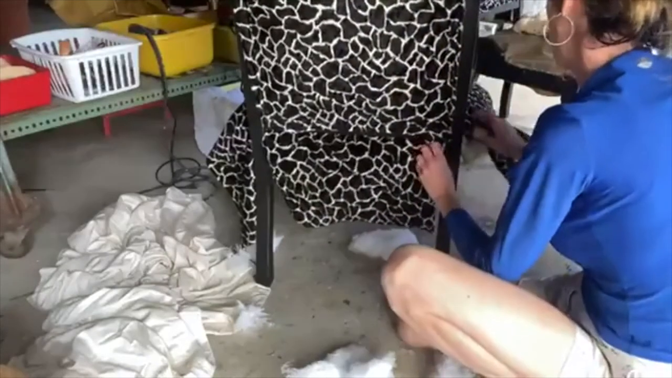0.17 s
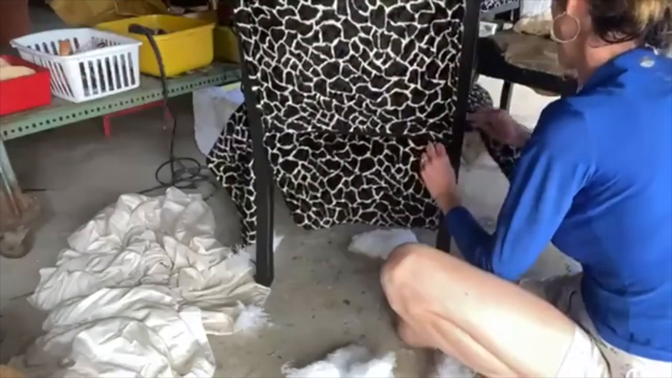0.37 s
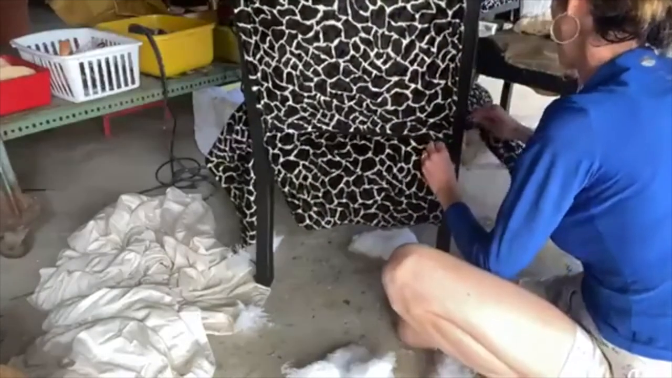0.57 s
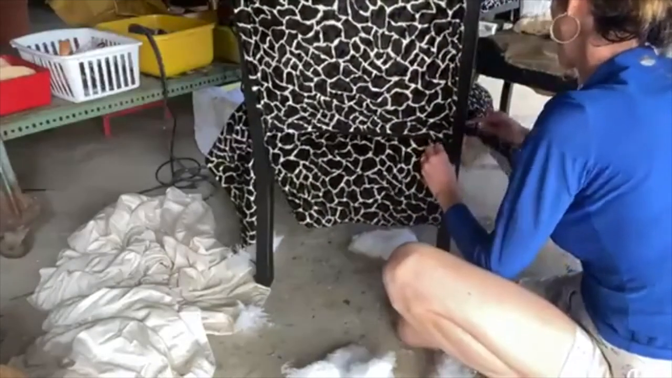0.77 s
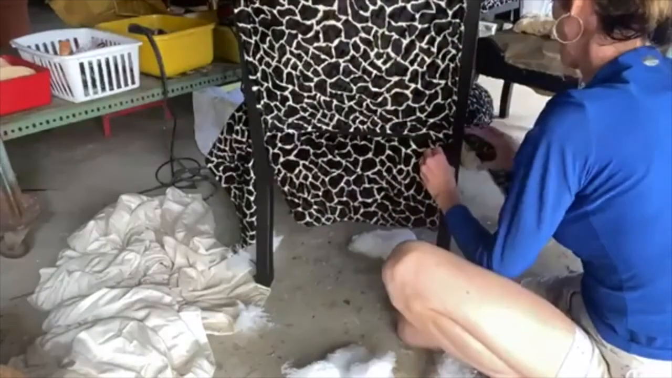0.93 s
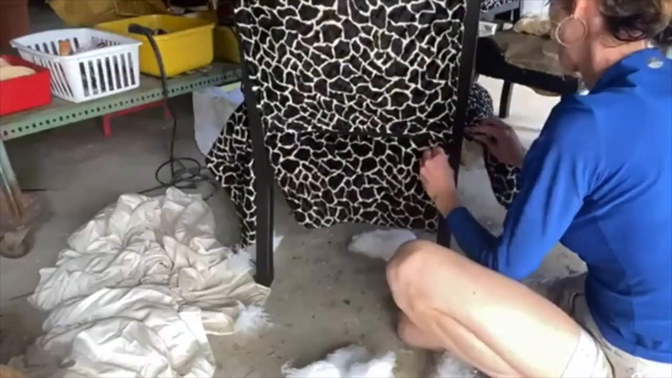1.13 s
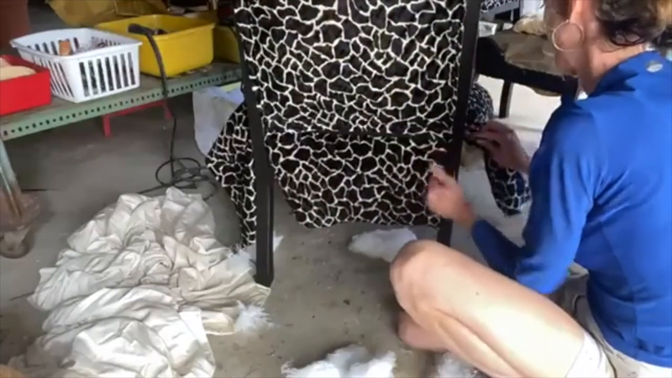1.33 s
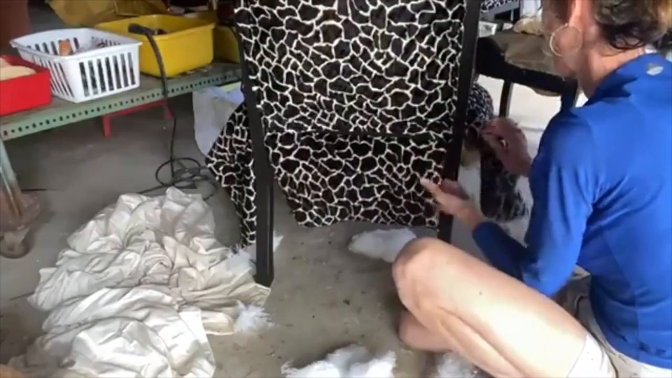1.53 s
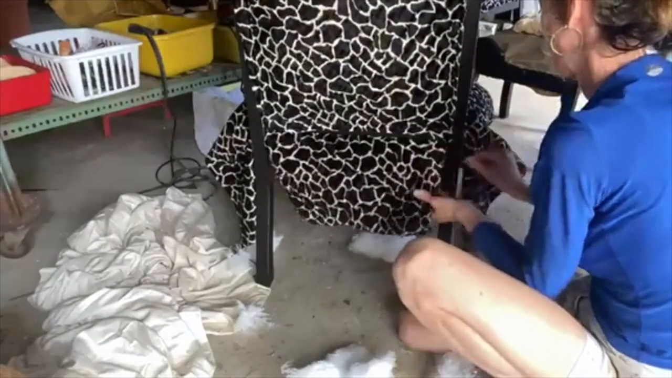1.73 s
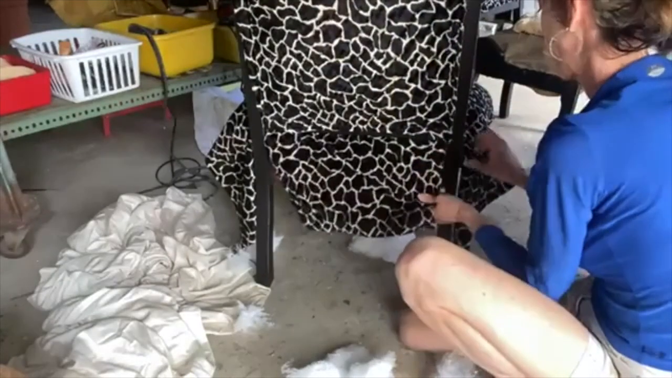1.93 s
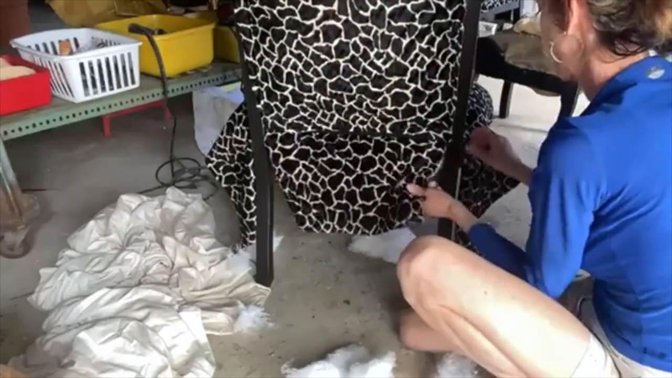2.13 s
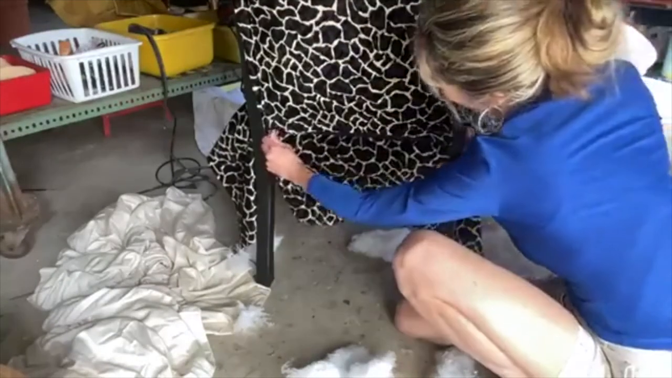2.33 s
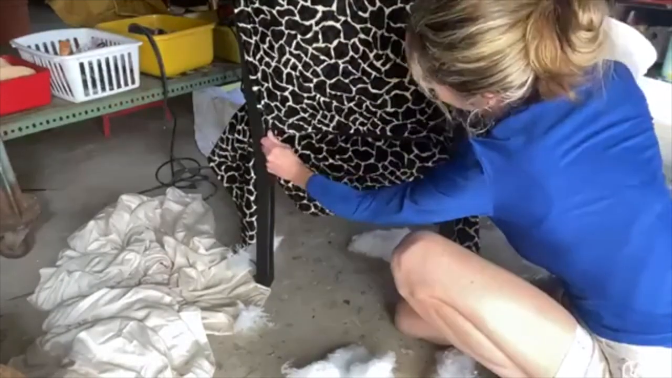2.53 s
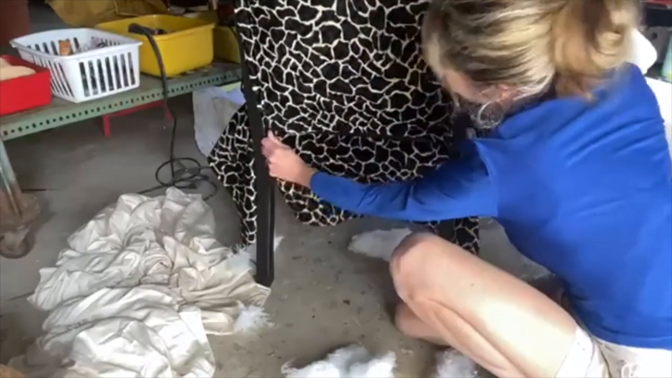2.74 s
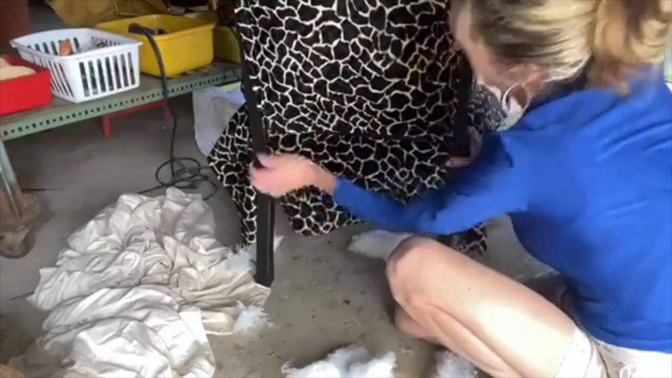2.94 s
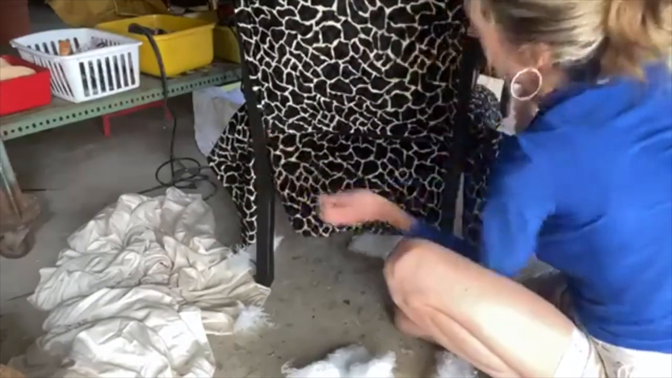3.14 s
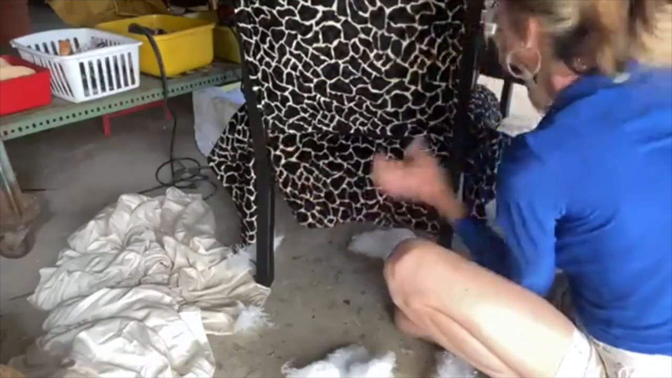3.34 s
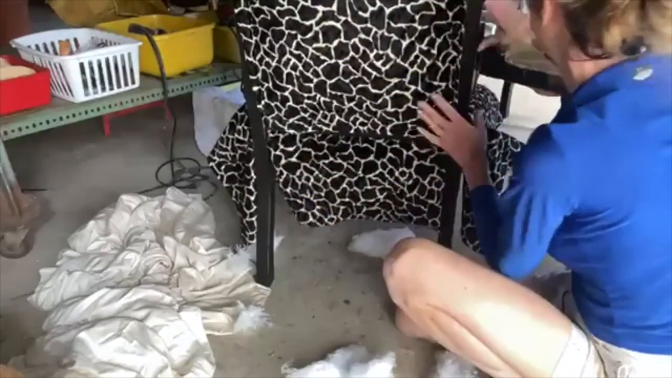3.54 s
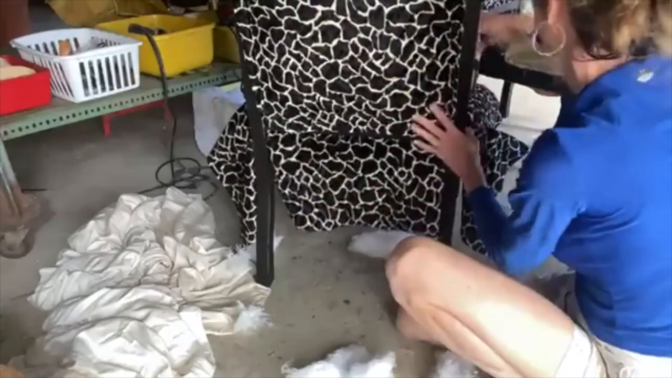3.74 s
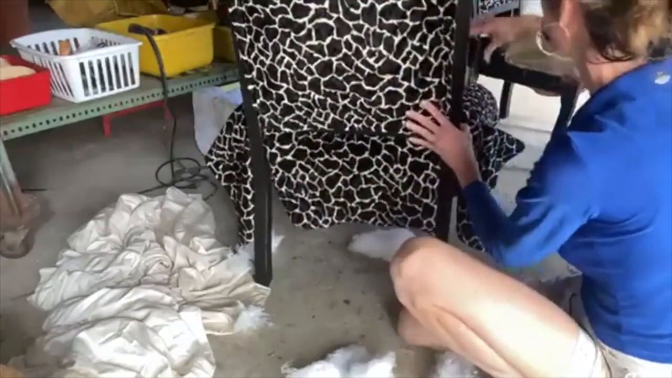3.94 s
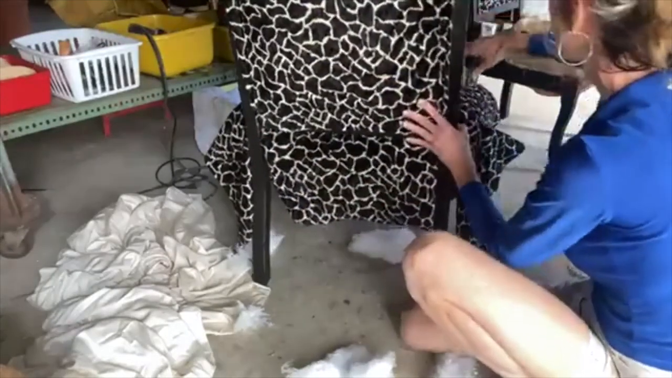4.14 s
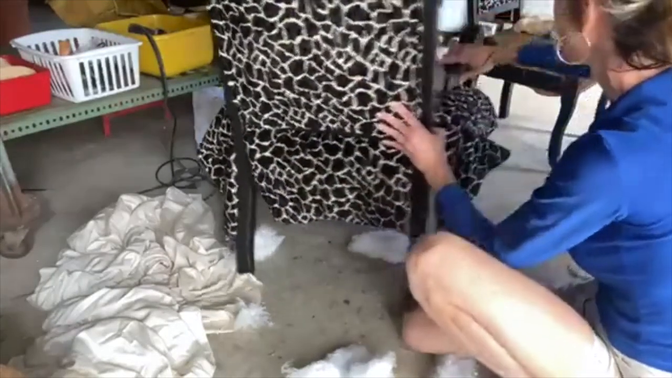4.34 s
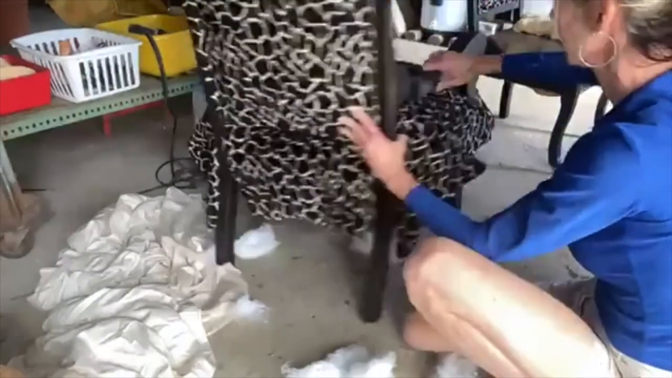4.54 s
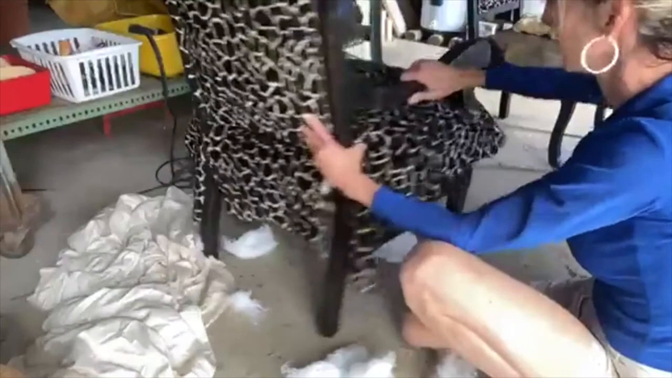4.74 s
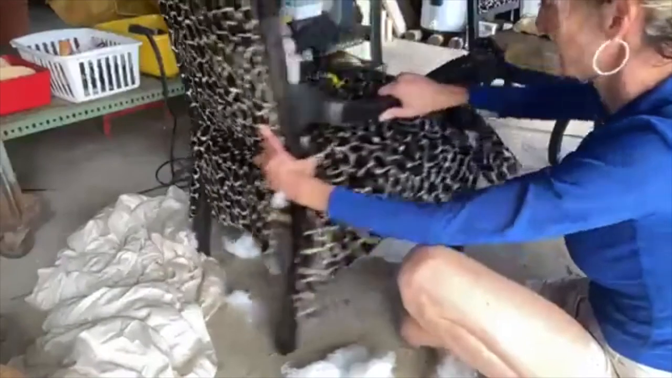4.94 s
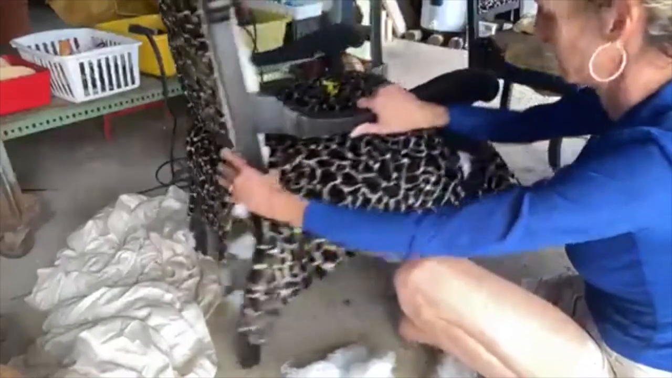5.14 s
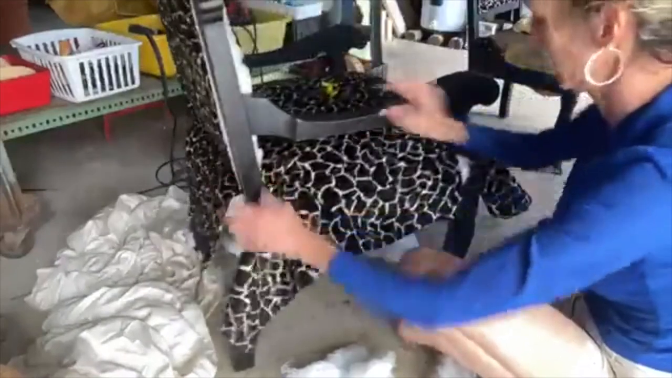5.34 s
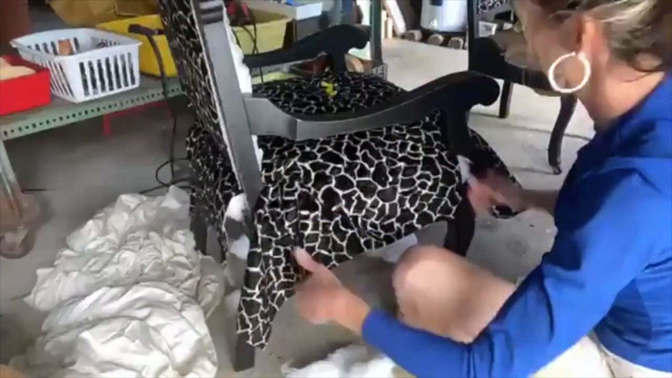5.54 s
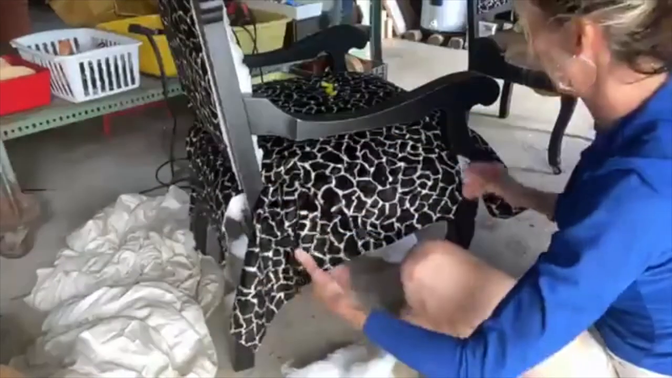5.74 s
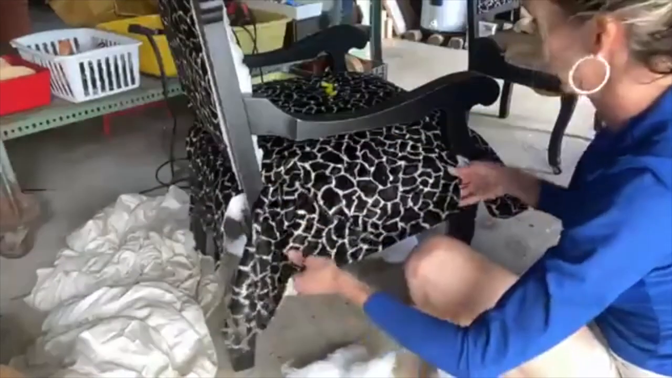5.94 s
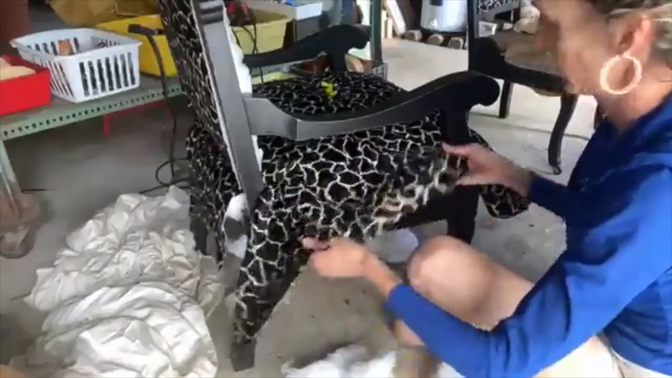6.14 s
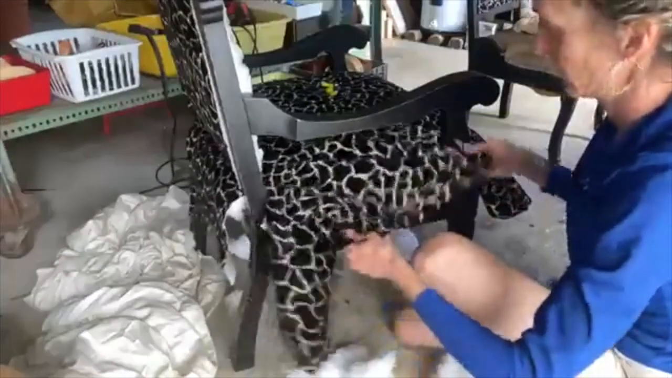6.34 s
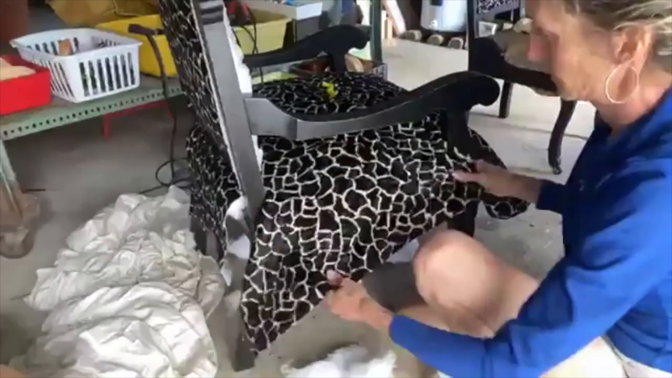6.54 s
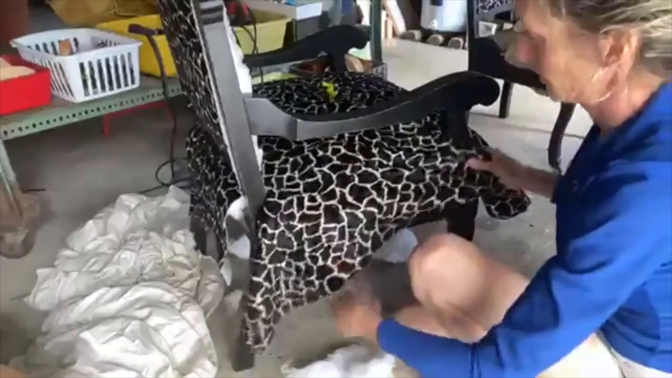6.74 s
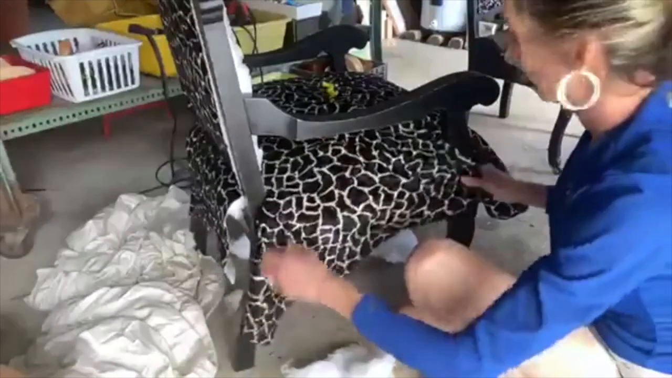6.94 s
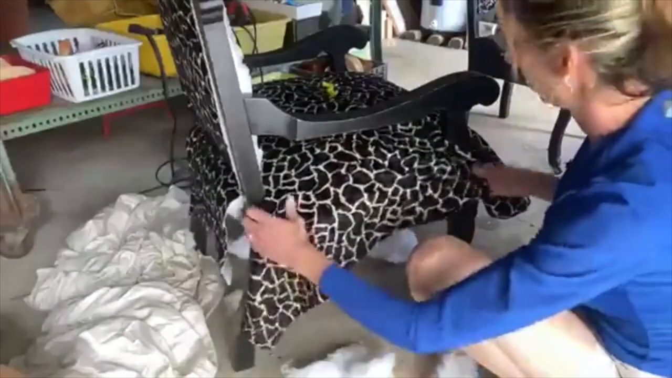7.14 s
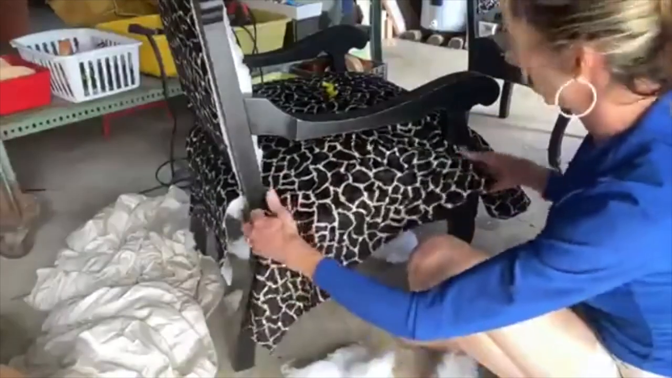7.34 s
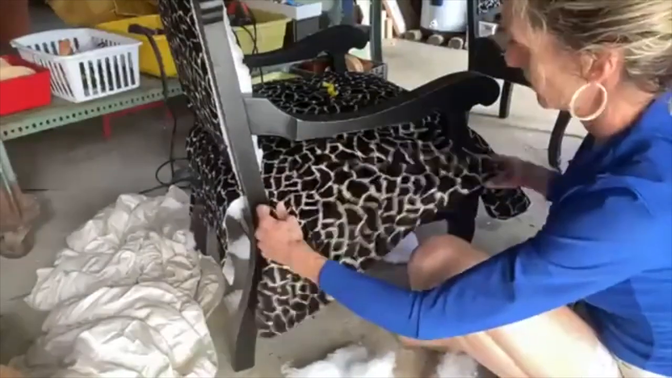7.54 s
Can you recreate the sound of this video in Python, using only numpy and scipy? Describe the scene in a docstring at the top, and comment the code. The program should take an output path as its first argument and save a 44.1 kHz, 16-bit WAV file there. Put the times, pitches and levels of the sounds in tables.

```python
"""A garage, humming and hissing faintly, where hard walls answer every knock on a wooden chair.
Fabric rustles as filtered noise; hand knocks, joint creaks and leg landings jolt the frame's resonances.
Then the chair is turned: its legs stick and slip over concrete as uneven clicks that ring the frame,
with a short squeal and groan made of swelling sines, while grit crunches under them as brighter clicks."""
import sys
import numpy as np
from scipy import signal
from scipy.fft import rfft, irfft, next_fast_len
from scipy.io import wavfile
from scipy.ndimage import map_coordinates

SR = 44100
rng = np.random.default_rng(int(sys.argv[2]) if len(sys.argv) > 2 else 0)


def unload_wav(signal):
    """Save mono or channel-first audio to the path in sys.argv[1] as 16-bit WAV at rate SR, clipped to [-1, 1]."""
    wavfile.write(
        sys.argv[1],
        SR,
        np.round(np.clip(np.atleast_2d(signal).T, -1, 1) * 32767).astype(np.int16),
    )


N = 335009
T = np.arange(N) / SR  # time in seconds

# Garage hum and hiss. Each row: frequency in Hz, relative level in dB per Hz.
AIR_COLOUR = [(12, -46), (20, -53), (56, 5.5), (95, 0), (186, -2), (291, -4.5), (601, -15.5), (672, -12),
              (993, -20), (1140, -12), (1350, -18.5), (7820, -31), (8500, -33.5), (14400, -36),
              (15700, -39)]
# A distant motor's low drone: frequency in Hz, width in Hz, level in dB.
DRONE = (83.4, 15, -61.5)
# How long the walls' answer lasts. Each row: frequency in Hz, t60 in seconds.
WALL_DECAY = [(150, 0.29), (1000, 0.15), (4000, 0.2), (12000, 0.11)]
# Brief dips in level. Each row: centre in seconds, half width in seconds.
LEVEL_DIPS = [(.127, 0.011), (5.864, 0.0092), (5.931, 0.014)]

# Fabric and hands moving. Each row: time in seconds, swish level in dB.
CLOTH_MOVES = [(0, -63), (0.1, -69.5), (3.65, -70), (3.84, -54), (4.0, -62), (4.1, -61), (5.35, -71),
               (5.6, -72.5), (5.94, -66.5), (6.24, -63), (6.6, -69.5), (7.34, -67.5), (7.6, -63.5)]
# Single strokes of cloth over cloth. Each row: start in seconds, length in seconds, swish in dB, sizzle in dB.
CLOTH_STROKES = [(0.523, 0.043, -78, -55), (1.677, 0.2, -79, -66), (3.114, 0.13, -59.5, -66),
                 (3.234, 0.084, -68, -64), (5.502, 0.035, -74, -61), (6.05, 0.099, -74, -89),
                 (6.274, 0.24, -72, -66), (6.552, 0.14, -65, -60.5), (6.808, 0.077, -58.5, -61),
                 (6.963, 0.12, -75, -64)]
# Colour of the soft swish. Each row: frequency in Hz, relative level in dB per Hz.
SWISH_COLOUR = [(880, -35), (1500, 1), (1590, -9), (1970, -2), (3810, -3.5), (6170, -6), (7890, -5.5),
                (15700, -33)]
# Colour of the low brush. Each row: frequency in Hz, relative level in dB per Hz.
BRUSH_COLOUR = [(88, -54), (150, -19), (255, -7), (363, 3.5), (548, 0), (837, -0.5), (2500, -18.5),
                (3250, -33), (5500, -120)]
# Colour of the finest rubbing noise. Each row: frequency in Hz, relative level in dB per Hz.
SIZZLE_COLOUR = [(6000, -40), (10000, -1), (12500, 4.5), (15000, 6)]

# The chair frame's resonances. Each row: frequency in Hz, width in Hz, relative level in dB.
FRAME_MODES = [(154, 63.7, 0), (184, 23, -0.5), (230.6, 22, -1), (339.4, 23, 2), (397, 45, 2),
               (539, 46, 8.5), (686, 106, 3), (786, 75, 3.5), (979, 172, 2), (1094, 58, 6.5),
               (1216, 170, 0.5), (1482, 200, 1.5), (1630, 94, 4), (1980, 170, -1), (2230, 230, -3),
               (2390, 590, -2.5), (2824, 77, -8), (3133, 58, -1.5), (3243, 116, -4), (3773, 78, 2.5),
               (4480, 51, 9), (5400, 270, -23)]
# Hand knocks and taps, coloured by where they land. Each row: start in seconds, body peak in dB,
# thud, ring and snap in dB over the body, echo in dB over the blow, then thud, body and ring centres in Hz.
HAND_KNOCKS = [(0.04, -36, -15, -2.5, -31, -1.5, 129, 1350, 3320),
               (0.256, -34.5, 5.5, -16, -26, -4.5, 141, 720, 2200),
               (0.34, -40, -26, -19, -15, -11, 242, 1460, 3030),
               (0.497, -42, 8, -20, -21, -8.5, 138, 500, 2690),
               (0.539, -33.5, -6, -19, -5, -8.5, 151, 1020, 2580),
               (0.63, -55, 11.5, -14, -12, -3.5, 138, 600, 2240),
               (0.981, -43, -14, -29, -27, -22, 152, 900, 2270),
               (1.139, -45, -15, -11, -16, -10, 132, 735, 2380),
               (3.233, -56, 4, -12, 16, -7, 121, 1050, 2950),
               (3.325, -60.5, -6, 17, -2, -8, 339, 649, 3550),
               (3.659, -36, 0.5, -12, -4.5, 2, 246, 770, 2430),
               (3.679, -24, -41, -10.5, -30, -4.5, 240, 1680, 2930),
               (3.776, -39, 1.5, -3, -11, -4, 236, 686, 3700),
               (3.815, -43, -2, -14, -24, -6, 236, 1490, 3040),
               (3.822, -20, -9.5, 1.5, -3.5, -3, 233, 1460, 3070),
               (3.839, -29, 3, -7, -3, -10, 153, 1410, 3100), (3.859, -40, -5, 3, 5.5, 4, 136, 1500, 3100),
               (3.982, -31.5, -5.5, -5.5, -0.5, -2.5, 182, 840, 2510),
               (4.154, -38.5, -1, 7.5, 6, -5, 271, 1010, 3750),
               (6.216, -37, -6.5, -17, -2, -6, 265, 870, 3400),
               (6.509, -61.5, 17.5, -6, -5, -15, 127, 1150, 2580),
               (6.842, -31.5, -15, -10.5, -33, -9, 156, 814, 2430),
               (7.084, -46, -3.5, -6, 0, -12, 196, 770, 3660),
               (7.589, -29, -30, -3, 3.5, -5, 450, 1580, 3280)]
# A joint creaks under the hand, slip by slip. Each row: start in seconds, body peak in dB,
# thud in dB over the body, thud centre in Hz, body centre in Hz.
JOINT_CREAKS = [(2.42, -27, -11.5, 360, 1100), (2.439, -34, -10, 365, 1060), (2.461, -30.5, -7, 150, 1060),
                (2.476, -35.5, -2.5, 350, 1020), (2.491, -36.5, -8.5, 150, 1040),
                (2.512, -43, 3, 150, 1190), (2.573, -27.5, -11.5, 130, 1140), (2.589, -35, -9, 340, 1090),
                (2.605, -42, -6, 150, 1340), (2.8, -34.5, -21, 120, 1120), (2.817, -34, -27, 170, 1300),
                (2.832, -39, -18, 200, 1140), (2.846, -42, -18, 200, 1140), (2.899, -31.5, -20, 280, 1520),
                (2.914, -38, -13, 280, 1300), (2.929, -37.5, -13.5, 190, 1075),
                (2.945, -42, -12, 190, 1100)]
# A dragged leg hops and lands. Each row: start in seconds, body peak in dB,
# ring in dB over the body, body centre in Hz, ring centre in Hz.
LEG_HOPS = [(4.555, -21.5, -15, 1000, 2430), (4.666, -19, -22, 764, 2290), (4.752, -16, -6, 1120, 3180),
            (4.836, -17, -5.5, 1300, 4300), (4.846, -19, 1, 1270, 3500), (4.946, -15.5, 0, 610, 2510),
            (4.972, -20, -7, 1080, 2440), (5.01, -12, -5, 740, 2580), (5.041, -21, -8, 735, 2200),
            (5.071, -25.5, -1, 773, 2800), (5.095, -16.5, -6, 640, 2360), (5.123, -16, -26, 597, 2600),
            (5.156, -14.5, -12, 975, 2420), (5.277, -29, 1.5, 1440, 3040)]
# Shared by all hand knocks: body and ring spreads in octaves, crack as a share of broad noise
# on the ring, damping t60 in seconds (how fast the grip stills the ring).
HAND_CONTACT = (0.81, 0.15, 0.34, 0.55)
# Shared by all creaks: ring and snap in dB over the body, echo in dB over the blow, ring centre in Hz,
# body and ring spreads in octaves, crack share, damping t60 in seconds (negative: it feeds the ring).
JOINT_CONTACT = (-11, -27, -3, 2900, 0.76, 0.26, 0.1, -1)
# Shared by all hops: thud and snap in dB over the body, echo in dB over the blow, thud centre in Hz,
# body and ring spreads in octaves, crack share, damping t60 in seconds (how fast the floor stills the ring).
LEG_CONTACT = (-9.5, -15.5, -5, 218, 0.9, 1, 4.2, 0.2)

# A slipping leg locks onto one resonance and sings. Each row: start in seconds, length in seconds,
# pitch in Hz, level in dB before the flutter.
LEG_SINGS = [(2.933, 0.056, 1115, -52), (3.704, 0.065, 822, -47.5), (4.114, 0.042, 298.7, -35),
             (4.191, 0.021, 362, -31), (4.247, 0.048, 1627, -21.5), (4.301, 0.036, 1620, -21.5),
             (4.283, 0.066, 345, -28.5), (4.325, 0.023, 354.5, -22), (4.35, 0.037, 339.5, -19),
             (4.399, 0.015, 343.7, -19), (4.492, 0.047, 960, -28), (4.552, 0.024, 346.6, -26.5),
             (4.553, 0.033, 1014, -27), (4.627, 0.04, 743, -25), (4.809, 0.026, 660, -25.5),
             (4.937, 0.014, 2610, -26.5), (5.032, 0.024, 708, -21), (5.034, 0.032, 189, -27),
             (5.129, 0.021, 185.6, -25), (5.156, 0.043, 226.4, -21.5), (5.201, 0.027, 185, -30),
             (5.203, 0.043, 790, -31)]
# The legs dragging. Each row: time in seconds, rasp level in dB, rumble and grit in dB over the rasp,
# all before the blend gains and unsteadiness in drag().
LEG_DRAG = [(4.07, -65, -6, -9), (4.125, -48.5, 9.5, -6.5), (4.17, -44.5, -3, -8), (4.21, -33, 4.5, -7.5),
            (4.28, -30.5, -6.5, -5), (4.4, -30, -4, -8), (4.46, -32, 1, -4), (4.62, -24.5, -6.5, -10),
            (4.75, -29, -6.5, -10.5), (4.9, -31, 0, -11.5), (4.96, -24.5, -12, -11), (5.0, -34, -7, -9),
            (5.02, -24.5, 0, -9), (5.09, -30, 1, -4), (5.19, -28, 2, -14), (5.24, -32, 4.5, -17.5),
            (5.29, -51, 8, 1), (5.37, -72, 6, 2)]
# Colour of the coarse grit. Each row: frequency in Hz, relative level in dB per Hz.
GRIT_COLOUR = [(820, -18), (1400, -21), (1680, -5), (2840, -7.5), (4010, -11.5), (4300, -11.5),
               (9860, -21.5), (15200, -81), (15700, -64)]

AIR_DB = -56  # centre level; it breathes around this
BRUSH_DB, BRUSH_SWINGS = 1.5, 1.49  # low brush over the median swish; how much wider it swings in dB
DUST_DB, DUST_GROWS_DB = -29.5, 22  # finest grit over the grit curve at the start, and its gain by the end
KEEN_START, KEEN_END = 0.89, 0.2  # share of the brighter rasp as the load moves to other legs
TURNING_ECHO_DB = -11.0  # how much of the turning chair reaches the walls
TOP_HZ = 15800  # upper band limit


def amp(db):
    """dB to gain."""
    return 10 ** (np.asarray(db) / 20)


def unit(x):
    """Scale to rms 1."""
    return x / np.sqrt(np.mean(x ** 2) + 1e-20)


def along(points, hz):
    """Read (Hz, value) points on a log frequency axis."""
    f, v = np.transpose(points)
    return np.interp(np.log(hz + 1), np.log(f + 1), v)


def curves(rows):
    """One value per sample for each column after the time."""
    times, *columns = np.transpose(rows)
    return [np.interp(T, times, column) for column in columns]


def during(rows, fade):
    """1 while the table runs, fading over some seconds beyond both ends."""
    first, last = rows[0][0], rows[-1][0]
    return np.interp(T, [first - fade, first, last, last + fade], [0, 1, 1, 0])


def wobble(rate):
    """A smooth random curve with rate knots a second."""
    knots = rng.standard_normal(int(N * rate / SR) + 4)
    return map_coordinates(knots, [T * rate])


def filtered(x, response):
    """Shape x by a complex response of frequency."""
    m = next_fast_len(N + SR // 2)
    return irfft(rfft(x, m) * response(np.fft.rfftfreq(m, 1 / SR)), m)[:N]


def coloured(x, spectrum):
    """Give x the colour of (Hz, dB) points, at rms 1."""
    return unit(filtered(x, lambda f: amp(along(spectrum, f))))


def peak(f, hz, width):
    """One causal resonance."""
    return 1j * f * width / (hz * hz - f * f + 1j * f * width)


def frame(lo_hz, hi_hz, centre_hz=1, octaves=np.inf):
    """The frame's resonances between two frequencies, favouring those near a centre."""
    modes = [(hz, width, db - 6 * (np.log2(hz / centre_hz) / octaves) ** 2)
             for hz, width, db in FRAME_MODES if lo_hz < hz < hi_hz]
    # neighbouring resonances have opposite signs
    return lambda f: sum((-1) ** k * amp(db) * peak(f, hz, width)
                         for k, (hz, width, db) in enumerate(modes))


def grains(rate, spread_db, smooth):
    """Random clicks of skewed but bounded sizes, rate a second, on a bed of plain noise."""
    size_db = spread_db * np.minimum(rng.exponential(size=N), 2.5)
    hits = rng.random(N) < rate / SR
    clicks = hits * amp(size_db) * rng.choice([-1, 1], N)
    return unit(clicks) + smooth * rng.standard_normal(N)


def catches(rate, scatter, spread_db):
    """One-way jerks as a foot catches and lets go, at uneven intervals."""
    count = np.cumsum(rate * np.exp(scatter * wobble(60))) / SR
    jerks = -np.diff(np.floor(count), prepend=0)
    return jerks * amp(spread_db * np.clip(rng.standard_normal(N), -2, 2))


def air():
    """Steady coloured noise, breathing a little, over a narrow resonant drone."""
    hz, width, db = DRONE
    drone = unit(filtered(rng.standard_normal(N), lambda f: peak(f, hz, width) ** 2))
    hiss = amp(AIR_DB + 1.1 * wobble(3.53)) * coloured(rng.standard_normal(N), AIR_COLOUR)
    return hiss + amp(db + 2.3 * wobble(0.99)) * drone


def walls(x):
    """Noise tails whose frequencies each die at their own speed; every stretch gets its own echoes."""
    out, step = np.zeros(N + SR), SR // 8
    delay = 250  # samples before the first answer
    for start in range(0, N, step):
        hz, t, z = signal.stft(rng.standard_normal(SR // 3), SR, nperseg=256)
        decay = amp(-60 * t / along(WALL_DECAY, hz)[:, None])
        tail = signal.istft(z * decay, SR, nperseg=256)[1]
        wet = signal.fftconvolve(x[start:start + step], tail / np.linalg.norm(tail))
        out[start + delay:][:len(wet)] += wet[:len(out) - start - delay]
    return out[:N]


def cloth():
    """Sliding fabric rubs out soft swishes and low brushes, with a few distinct sizzling strokes."""
    swish = coloured(rng.standard_normal(N), SWISH_COLOUR)
    brush = coloured(rng.standard_normal(N), BRUSH_COLOUR)
    sizzle = coloured(grains(2500, spread_db=4, smooth=1.2), SIZZLE_COLOUR)
    strokes = np.zeros(N)
    for s, length, stroke_db, sizzle_db in CLOTH_STROKES:
        swell = np.sin(np.pi * np.clip((T - s) / length, 0, 1))
        strokes += swell * (amp(stroke_db) * swish + amp(sizzle_db) * sizzle)
    swish_db, = curves(CLOTH_MOVES)
    brush_db = swish_db + BRUSH_DB + (BRUSH_SWINGS - 1) * (swish_db - np.median(swish_db))
    rustle = strokes + amp(swish_db) * swish + amp(brush_db) * brush
    return rustle * amp(1.8 * wobble(25))


def contact_rows():
    """Every knock, creak and hop as a full knock row, followed by its spreads, crack and damping."""
    knocks = [(*row, *HAND_CONTACT) for row in HAND_KNOCKS]
    ring_db, snap_db, echo_db, ring_hz, *rest = JOINT_CONTACT
    creaks = [(s, db, thud_db, ring_db, snap_db, echo_db, thud_hz, body_hz, ring_hz, *rest)
              for s, db, thud_db, thud_hz, body_hz in JOINT_CREAKS]
    thud_db, snap_db, echo_db, thud_hz, *rest = LEG_CONTACT
    hops = [(s, db, thud_db, ring_db, snap_db, echo_db, thud_hz, body_hz, ring_hz, *rest)
            for s, db, ring_db, body_hz, ring_hz in LEG_HOPS]
    return knocks + creaks + hops


def contacts():
    """Brief jolts ring low, middle and high parts of the frame, plus a snap; gives direct and wall feeds."""
    near, far, size = np.zeros(N + SR), np.zeros(N + SR), SR // 4
    t, f = np.arange(size) / SR, np.fft.rfftfreq(size, 1 / SR)
    snap_colour = amp(along([(1200, -25), (2500, -1), (5000, 8.0), (9000, -4.5), (15000, -15)], f))
    for (s, db, thud_db, ring_db, snap_db, echo_db, thud_hz, body_hz, ring_hz,
         spread, ring_spread, crack, damping) in contact_rows():
        jolts = amp(-60 * t / [[.012], [.012], [.02]]) * rng.standard_normal((3, size))
        jolts[:2] *= .16  # body and ring: one clean contact, then a faint rattle
        jolts[:2, 0] = 1
        body_jolt, ring_jolt, snap_jolt = rfft(jolts)
        thud = frame(0, 450, thud_hz, .6)(f) / (1 + 1j * f / 600)  # the slow frame feels one soft push
        body = frame(450, 2100, body_hz, spread)(f) * body_jolt
        ring_modes = frame(2100, SR, ring_hz, ring_spread)(f)
        ring = (ring_modes + crack * peak(f, ring_hz, 820)) * ring_jolt  # a ring on a broad crack
        parts = irfft([thud, body, ring, snap_colour * snap_jolt], size)
        parts *= (1 - np.exp(-t / 0.00054)) * (t < .2)  # the contact builds up
        parts[1:] *= amp(-60 * t / damping)
        levels = amp(db + np.array([thud_db, 0, ring_db, snap_db]))
        blow = levels / np.abs(parts).max(axis=1) @ parts
        near[round(s * SR):][:size] += blow
        far[round(s * SR):][:size] += amp(echo_db) * blow
    return near[:N], far[:N]


def sing():
    """Regular slips at one pitch swell quickly and fade, slightly unsteady, with a weak octave."""
    out = np.zeros(N)
    drift = 0.0069 * np.cumsum(wobble(90)) / SR  # seconds of wander
    flutter = wobble(110)
    for s, length, hz, db in LEG_SINGS:
        span = slice(round(s * SR), round((s + length) * SR))
        phase = 2 * np.pi * hz * (T + drift)[span]
        swell = np.sqrt(np.abs(np.sin(np.pi * np.linspace(0, 1, len(phase)) ** 0.74)))
        out[span] += amp(db) * swell * (np.sin(phase) + amp(-22.5) * np.sin(2 * phase))
    return out * amp(1.1 * flutter)


def drag():
    """Dense uneven slips of the legs shake the frame; grit crushed under them crackles above."""
    rasp_db, rumble_over_db, grit_over_db = curves(LEG_DRAG)
    rumble_db, grit_db = rasp_db + rumble_over_db, rasp_db + grit_over_db
    turned = np.interp(T, [LEG_DRAG[0][0], LEG_DRAG[-1][0]], [0, 1])
    chatter = wobble(70)  # unsteadiness shared by all layers on the rough floor

    shoves = grains(300, spread_db=5, smooth=1.7)
    light = unit(filtered(shoves, frame(0, 450, 300, 0.67)))
    heavy = unit(filtered(shoves, frame(0, 450, 190, 0.67)))
    rumble = (1 - turned) * light + turned * heavy  # it deepens as the chair swings round

    slips = grains(500, spread_db=5.0, smooth=0.82)
    dull = unit(filtered(slips, frame(450, 2100, 765, 0.77)))
    keen = unit(filtered(slips, frame(450, 2100, 1020, 0.51)))
    # which legs bear the load sets the colour
    keen_share = np.clip(KEEN_START + (KEEN_END - KEEN_START) * turned + 0.13 * wobble(14), 0, 1)
    rasp = (1 - keen_share) * dull + keen_share * keen

    grit = coloured(grains(2500, spread_db=3.5, smooth=.7), GRIT_COLOUR)
    jerks = catches(110, scatter=.6, spread_db=3.5)
    bump = unit(filtered(jerks, lambda f: peak(f, 614, 480) * peak(f, 810, 840)))
    tick = unit(filtered(jerks, lambda f: peak(f, 2930, 1900) ** 2))  # each jerk also cracks some grit
    rumble = .9 * rumble
    rasp = .8 * rasp + .6 * bump
    grit = .9 * grit + .25 * tick

    dust_db = grit_db + DUST_DB + DUST_GROWS_DB * turned + 1.5 * chatter
    dust = amp(dust_db) * coloured(grains(3000, spread_db=3, smooth=1.5), SIZZLE_COLOUR)
    rumble = amp(rumble_db + 0.32 * chatter) * rumble
    rasp = amp(rasp_db + 0.47 * chatter + 0.43 * wobble(110)) * rasp
    grit = amp(grit_db + 0.75 * chatter + 2.7 * wobble(120)) * grit
    return during(LEG_DRAG, fade=0.036) * (dust + rumble + rasp + grit)


def scene():
    """The chair and its echoes over fabric and background."""
    direct, echoed = contacts()
    turning = drag() + sing()
    room = walls(echoed + amp(TURNING_ECHO_DB) * turning)
    return (direct + turning + room + cloth() + air())[None]


def record(dry):
    """The level dips briefly; the microphone loses deep bass; nothing passes above the band limit."""
    gain = np.prod([np.clip(np.abs(T - s) / half, .03, 1) for s, half in LEVEL_DIPS], axis=0)
    return filtered(dry[0] * gain, lambda f: (1j * f / (45 + 1j * f)) ** 2 * (f < TOP_HZ))[None]


dry = scene()
out = record(dry)
unload_wav(out)
```